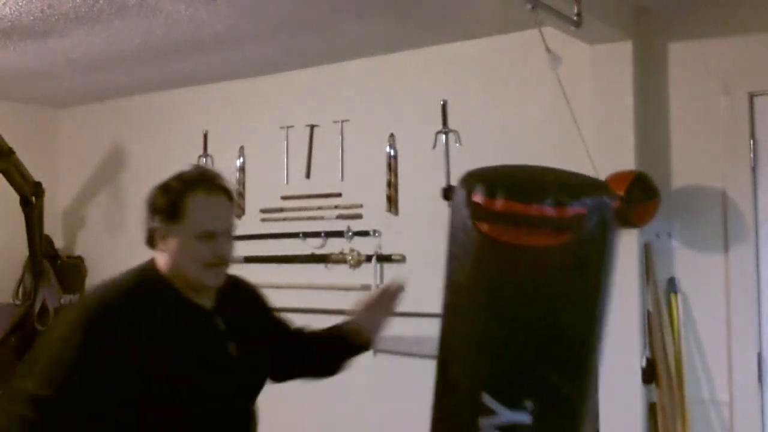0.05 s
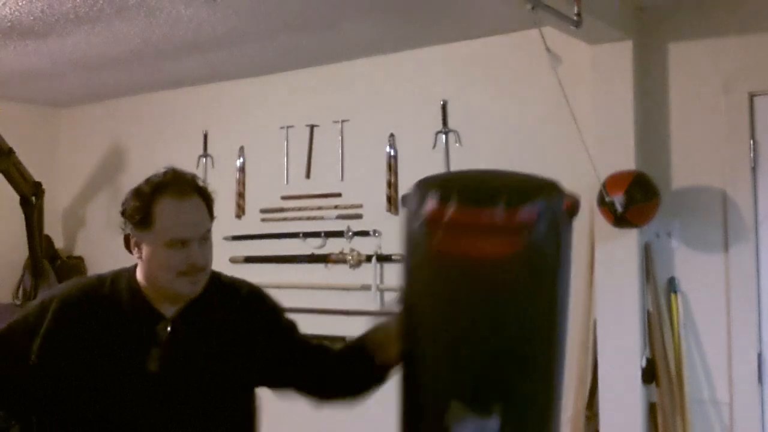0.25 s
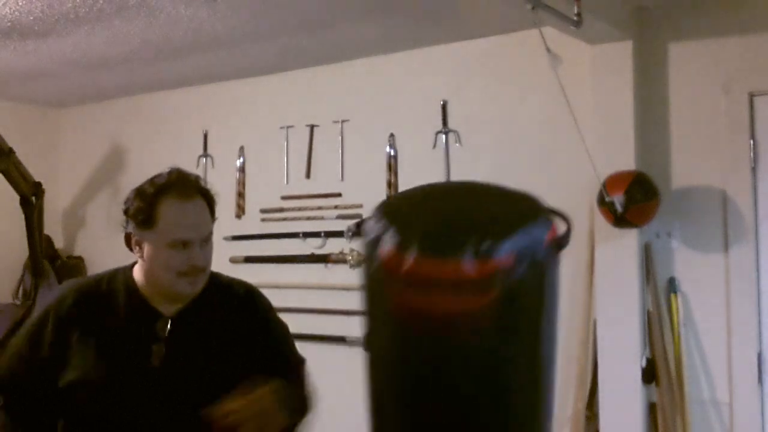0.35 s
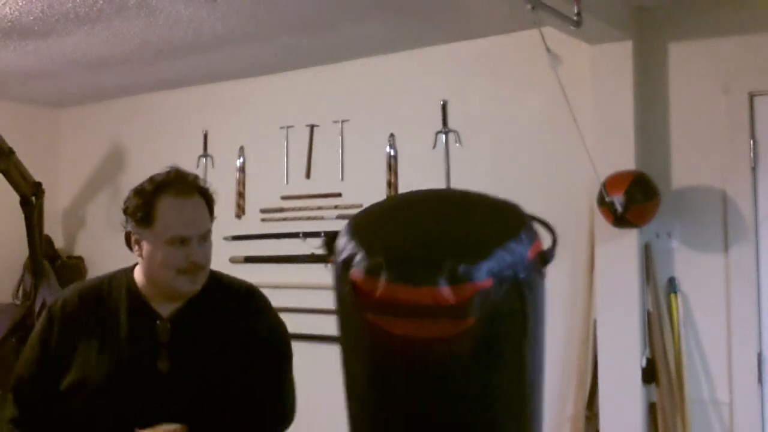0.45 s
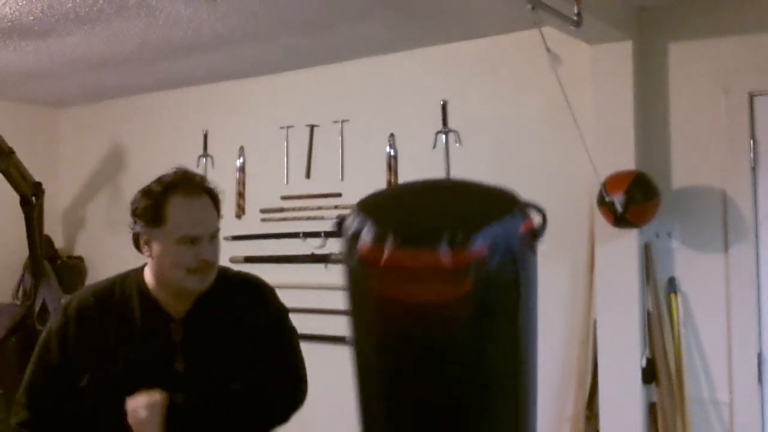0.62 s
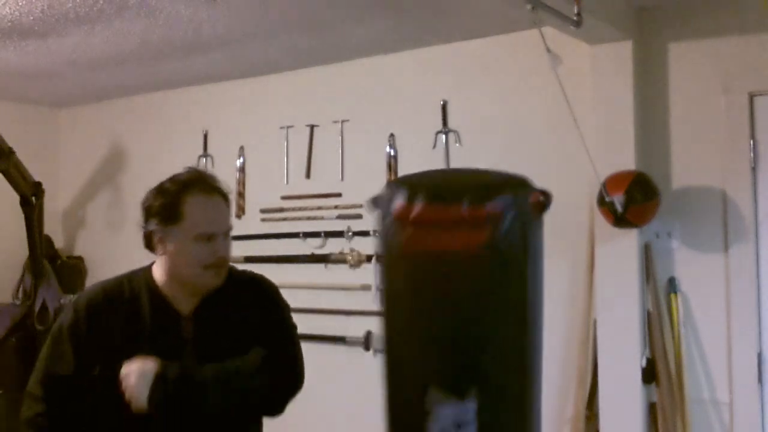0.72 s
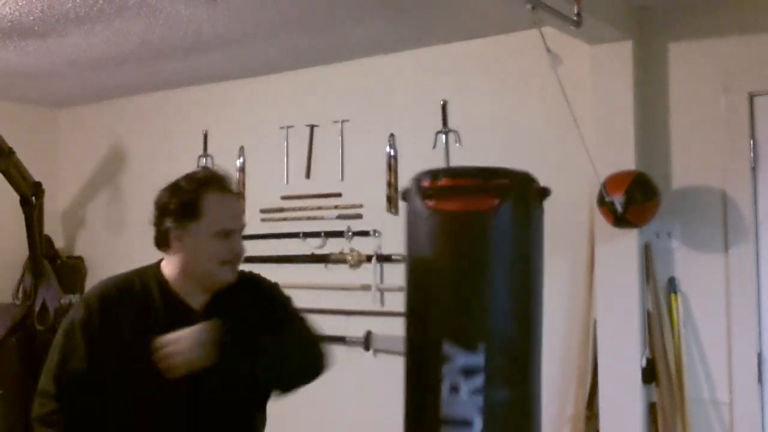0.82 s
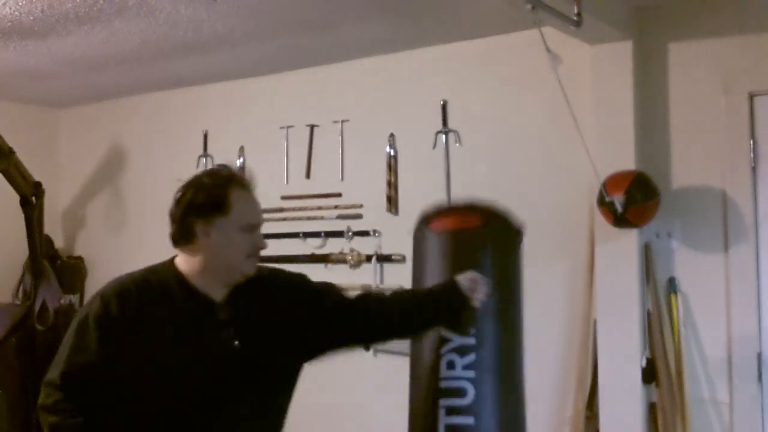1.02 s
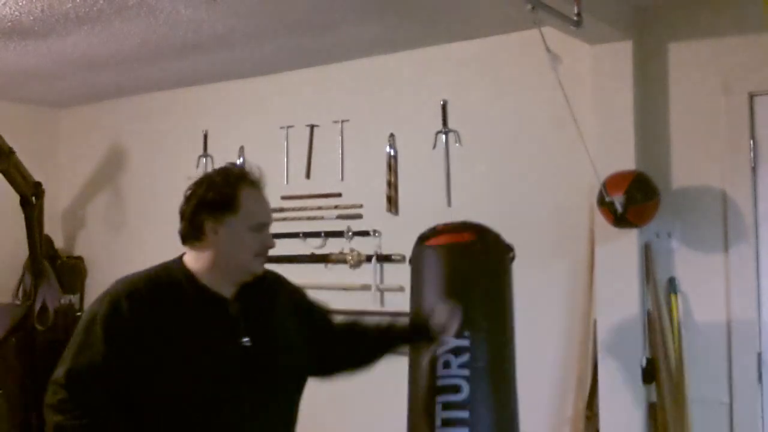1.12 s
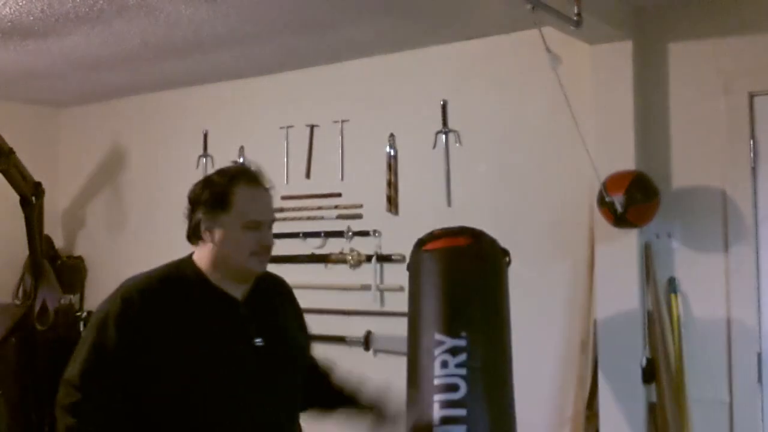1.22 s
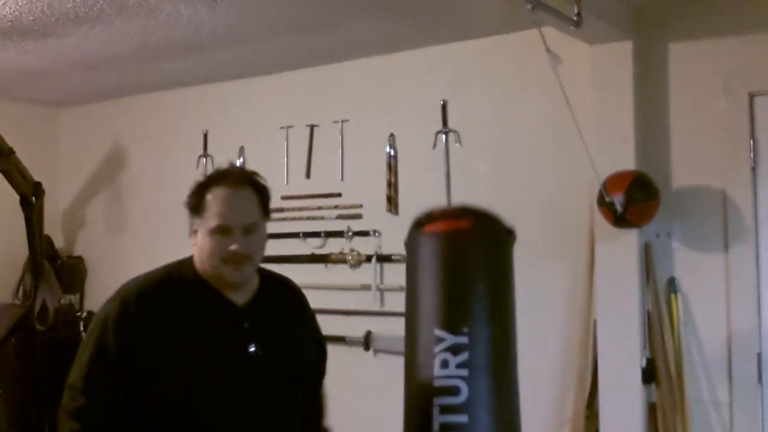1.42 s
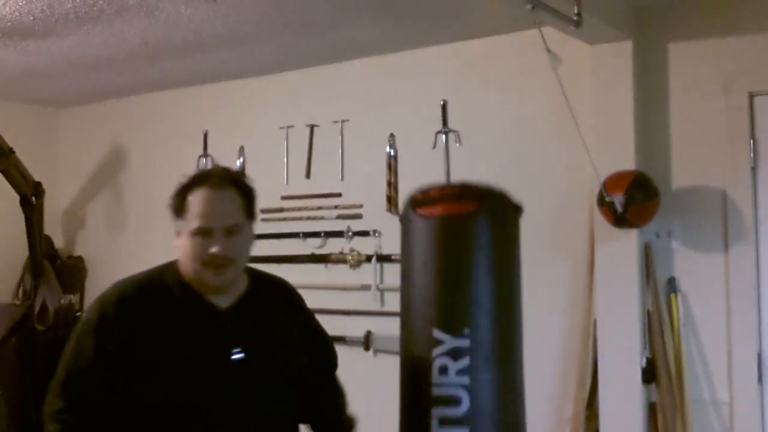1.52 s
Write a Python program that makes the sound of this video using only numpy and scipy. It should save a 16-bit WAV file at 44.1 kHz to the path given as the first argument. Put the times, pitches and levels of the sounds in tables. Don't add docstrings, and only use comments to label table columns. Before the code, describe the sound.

Bare fists punching a heavy vinyl bag, dull thuds with skin slaps ringing in a bare garage

```python
import sys
import numpy as np
from scipy import signal
from scipy.fft import rfft, irfft, next_fast_len
from scipy.io import wavfile
from scipy.ndimage import uniform_filter1d, minimum_filter1d, map_coordinates

SR = 44100
rng = np.random.default_rng(int(sys.argv[2]) if len(sys.argv) > 2 else 0)


def pcm_store(signal):
    levels = np.round(np.clip(np.atleast_2d(signal), -1, 1) * 32767)
    wavfile.write(sys.argv[1], SR, levels.astype(np.int16).T)


def how_loud(loudness_db):
    steps = np.asarray(loudness_db, float) / 20
    return 10 ** steps


N = 68355

# freq_hz, density_db
AIR_COLOUR = [(25, -10), (50, -2), (130, -20), (280, -8.5), (500, -12.5), (2000, -17.5), (6000, -24.5),
              (16000, -14)]
# peak_s, rise_s, fall_s, body_db, fine_hiss_db
SLEEVE_STROKES = [
    (.14, 0.098, 0.079, -40.5, -36.5),
    (.89, 0.25, 0.3, -51.5, -72),
    (1.56, 0.18, .05, -46, -45.5),
]
# freq_hz, density_db
CLOTH_BODY = [(300, -13), (700, -2), (2000, -7), (5000, -2), (8000, -8.5), (16000, -24)]
# freq_hz, density_db
CLOTH_HISS = [(4000, -41), (8000, -17), (12000, -13), (16000, -16)]
# start_s, shell_pitch_factor
TIP_STARTS = [
    (.28, .92),
    (.852, 1.02),
    (1.13, .82),
]
# swell_s, ring_db, thud_db, creak_db
TIP_LEVELS = [
    (0.046, 21, -37, -23.5),
    (0.048, 4, -53.5, -46.5),
    (0.055, 8.5, -35, -44),
]
# mode_hz, t60_s, level_db
SHELL_MODES = [(264.4, 0.27, -28.5), (291.4, 0.34, -33.5), (471.5, 0.31, -41), (583, 0.33, -46),
               (755, .3, -46)]
# freq_hz, density_db
CREAK_COLOUR = [(300, -26.5), (600, 3), (1400, 2), (2200, -6), (3000, -2), (5000, -0.5), (8000, -10.5),
                (16000, -5.5)]
# freq_hz, density_db
THUD_COLOUR = [(40, -25), (110, -24.5), (160, 0), (300, -1), (450, -2.5), (540, -12.5), (1000, -13.5),
               (3000, -35.5)]
# push_s, slap_s
BLOW_TIMES = [
    (-.1, -.1),
    (.2238, .2196),
    (1.0163, 1.0183),
]
# push_db, slap_db, room_slap_db, sting_db (added to the treble)
BLOW_LEVELS = [
    (-18, -42, -36.5, -1.5),
    (-11, -24, -19.5, 2.5),
    (-12.5, -23, -26, -2),
]
# freq_hz, density_db
SKIN_COLOUR = [(300, -5.5), (600, 0), (1200, 0.5), (2000, -2), (2800, -2.5), (5000, -3), (8000, -12.5),
               (16000, -9.5)]
# mode_hz, t60_s, first_blow_db, second_blow_db, third_blow_db
ROOM_MODES = [(107.4, 0.38, -39, -19.5, -24.5), (159.8, 0.6, -30.5, -41, -22.5),
              (193.5, 0.65, -23.5, -44, -19.5), (220.1, 0.82, -25, -19, -24), (263.8, 1, -41, -29.5, -28),
              (302.2, 0.99, -34.5, -24, -31), (348, 0.47, -27.5, -45, -39),
              (436.5, 0.59, -31, -26.5, -25.5), (465, 0.57, -37, -32, -37), (620.6, 0.36, -34, -24.5, -33)]
# mode_hz, t60_s, first_blow_db, second_blow_db, third_blow_db
BASE_MODES = [(57, 0.31, -57, -18, -22.5), (88.8, 0.131, -47, -12, -13.5)]
# freq_hz, t60_s
WALL_DECAY = [(60, 0.93), (220, 0.83), (1000, 0.61), (5000, 0.66), (10000, 0.41), (16000, 0.4)]
# freq_hz, likeness_0_to_1
MIC_LIKENESS = [(60, 0.74), (180, 0.97), (550, 0.66), (1650, -0.0), (4970, 0.051), (15000, 0.052)]
# freq_hz, gain_db
PORT_RESONANCE = [(40, 1), (2100, -0.5), (2800, 2.5), (3500, -0.5), (4900, 7.5), (5600, 3), (7500, -6.5),
                  (16000, -16.5)]


def unit(x):
    return x / np.sqrt(np.mean(x ** 2) + 1e-20)


def along(points, hz):
    f, v = np.transpose(points)
    return np.interp(np.log(hz + 1), np.log(f + 1), v)


def clock():
    return np.arange(-SR // 4, N) / SR


def wobble(rate_hz):
    t = clock() - clock()[0]
    knots = rng.standard_normal(int(t[-1] * rate_hz) + 4)
    return map_coordinates(knots, [t * rate_hz])


def coloured(x, spectrum, level=True):
    m = next_fast_len(x.shape[-1] + 8192, True)
    log_gain = np.log(how_loud(along(spectrum, np.fft.rfftfreq(m, 1 / SR))))
    log_energy = np.log(np.mean(np.exp(2 * log_gain)))
    cepstrum = irfft(log_gain - level * log_energy / 2, m)
    cepstrum[1:m // 2] *= 2
    cepstrum[m // 2 + 1:] = 0
    return irfft(rfft(x, m) * np.exp(rfft(cepstrum)), m)[..., :x.shape[-1]]


def paired(pair):
    n = pair.shape[1]
    m = next_fast_len(n + 8192)
    likeness = along(MIC_LIKENESS, np.fft.rfftfreq(m, 1 / SR))
    turn = np.arccos(np.clip(likeness, -1, 1)) / 2
    mid, side = irfft(rfft(pair, m) * [np.cos(turn), np.sin(turn)], m)[:, :n]
    return np.array([mid + side, mid - side])


def walls(x, build_s):
    hz, t, z = signal.stft(rng.standard_normal((2, SR)), SR, nperseg=256)
    decay = how_loud(-60 * t / along(WALL_DECAY, hz)[:, None])
    tail = signal.istft(z * decay, SR, nperseg=256)[1]
    build = 1 - np.exp(-np.arange(tail.shape[1]) / SR / build_s)
    tail = paired(tail * build)
    tail = tail / np.linalg.norm(tail[0])
    return signal.fftconvolve(x[None], tail, axes=1)[:, :len(x)]


def ringing(start_s, modes, rise_s):
    waver_db, drift_cycles = 1.5, 0.049
    t = np.clip(clock() - start_s, 0, None)
    swell = 1 - np.exp(-(t / rise_s) ** 2)
    out = 0
    for hz, t60, db in modes:
        level = how_loud(db - 60 * t / t60 + waver_db * wobble(24.1))
        cycles = hz * t + rng.random() + drift_cycles * wobble(20)
        out = out + level * swell * np.sin(2 * np.pi * cycles)
    return out


def air():
    hiss_db, hum_hz, hum_db = -48.5, 118.5, -58
    t = clock()
    hiss = unit(paired(coloured(rng.standard_normal((2, len(t))), AIR_COLOUR)))
    hum = np.sin(2 * np.pi * hum_hz * t)
    return how_loud(hiss_db + 0.27 * wobble(6.7)) * hiss + how_loud(hum_db + wobble(8)) * hum


def sleeves():
    t, out = clock(), 0
    for layer, spectrum in enumerate([CLOTH_BODY, CLOTH_HISS]):
        stroke = 0
        for peak, rise, fall, *levels_db in SLEEVE_STROKES:
            width = np.where(t < peak, rise, fall)
            stroke = stroke + how_loud(levels_db[layer]) * np.exp(-((t - peak) / width) ** 2)
        stroke = stroke * how_loud(0.27 * wobble(58.9))
        brush = paired(coloured(rng.standard_normal((2, len(t))), spectrum))
        out = out + stroke * brush
    return out


def rocking():
    wall_db, wall_build_s = -1.5, 0.0027
    out = 0
    for (start, pitch), (swell, ring_db, thud_db, creak_db) in zip(TIP_STARTS, TIP_LEVELS):
        t = np.clip(clock() - start, 0, None) / swell
        thud_noise, creak_noise = rng.standard_normal((2, 2, len(t)))
        thud = how_loud(thud_db) * coloured(thud_noise, THUD_COLOUR)
        creak = how_loud(creak_db) * coloured(creak_noise, CREAK_COLOUR)
        scuff = (thud + creak) * t * np.exp((1 - t ** 2) / 2)
        shell = [(hz * pitch, t60, db + ring_db) for hz, t60, db in SHELL_MODES]
        ring = ringing(start, shell, swell)
        out = out + ring + paired(scuff) + how_loud(wall_db) * walls(scuff[0], wall_build_s)
    return out


def skin_slap(t, skin):
    knuckle_s, knuckle_loss_db = 0.0022, 1
    spread_s, touch_s, touch_db = 0.0067, 0.00446, -26

    def after(wait_s, fade_s):
        return np.clip((t - wait_s) / 0.00013, 0, 1) * np.exp(-abs(t - wait_s) / fade_s)

    knuckles = sum(how_loud(-knuckle_loss_db * j) * after(j * knuckle_s, 0.00058) for j in range(6))
    contact = knuckles + 0.25 * after(0, spread_s) + how_loud(touch_db) * after(-touch_s, 0.013)
    return coloured(contact * paired(rng.standard_normal((2, len(t)))), skin)


def fist_push(start_s):
    push_s = 0.00526
    u = np.clip((clock() - start_s) / push_s, 0, 1)
    return -np.sin(2 * np.pi * u) * np.sin(np.pi * u)


def blows():
    sting_hz, wall_build_s = 3500, 0.014
    slap_wet_db, thud_wet_db = 36, 24
    boom_rise_s, base_lag_s, base_rise_s = 0.015, 0.0119, 0.0075
    out = 0
    for k, ((push_s, slap_s), levels_db) in enumerate(zip(BLOW_TIMES, BLOW_LEVELS)):
        push_db, slap_db, room_db, sting_db = levels_db
        t = clock() - slap_s
        skin = [(hz, db + sting_db * (hz > sting_hz)) for hz, db in SKIN_COLOUR]
        slap = how_loud(slap_db + 9) * skin_slap(t, skin)
        push = how_loud(push_db) * fist_push(push_s)
        instant = 1. * (np.arange(len(t)) == np.argmax(t > 0))
        answer = how_loud(room_db + slap_wet_db) * coloured(instant, skin)
        answer = answer + how_loud(push_db + thud_wet_db) * coloured(instant, THUD_COLOUR)
        room = [(row[0], row[1], row[2 + k]) for row in ROOM_MODES]
        base = [(row[0], row[1], row[2 + k]) for row in BASE_MODES]
        boom = ringing(push_s, room, boom_rise_s)
        boom = boom + ringing(push_s + base_lag_s, base, base_rise_s)
        out = out + slap + push + boom + walls(answer, wall_build_s)
    return out


def scene():
    right_db = 1.5
    mix = blows() + rocking() + sleeves() + air()
    return (mix * how_loud([[-right_db], [right_db]]))[:, -N:]


def roll_off(x):
    return signal.sosfilt(signal.butter(12, 16630, fs=SR, output="sos"), x)


def record(dry):
    bass_cut_hz, top_hz, top_db = 42, 15800, -25
    ceiling_db, squeeze, hold_s, recover_s = -15.5, 0.4, 0.0093, 0.01
    bass_cut = signal.butter(2, bass_cut_hz, "high", fs=SR, output="sos")
    x = signal.sosfilt(bass_cut, coloured(dry, PORT_RESONANCE, level=False))
    power = uniform_filter1d(np.mean(x ** 2, 0), round(hold_s * SR))
    level = np.sqrt(abs(power)) + 1e-9
    need = np.minimum(1, how_loud(ceiling_db) / level) ** squeeze
    size = round(recover_s * SR)
    gain = uniform_filter1d(minimum_filter1d(need, size), size // 4)
    x = x * np.pad(gain, (size // 2, 0), "edge")[:N]
    band = np.where(np.fft.rfftfreq(N, 1 / SR) < top_hz, 1, how_loud(top_db))
    x = irfft(rfft(x) * band, N)
    return roll_off(x)


dry = scene()
out = record(dry)
pcm_store(out)
```